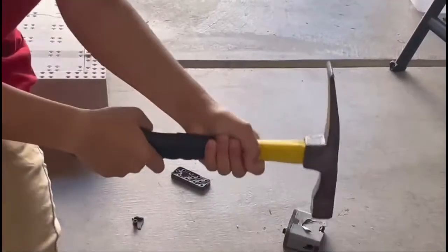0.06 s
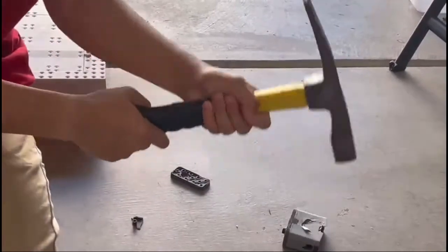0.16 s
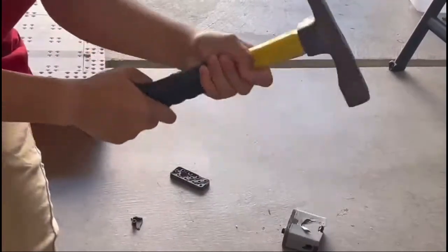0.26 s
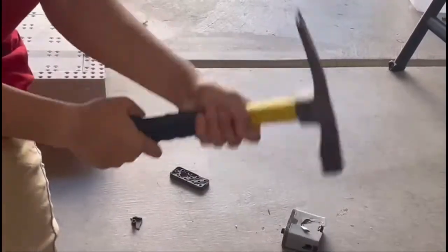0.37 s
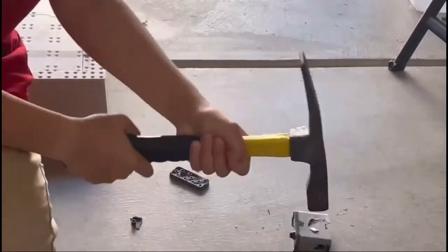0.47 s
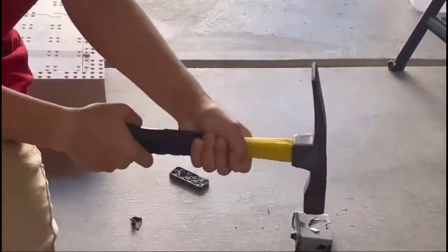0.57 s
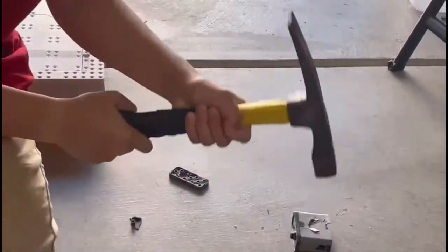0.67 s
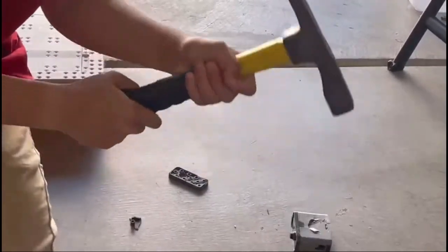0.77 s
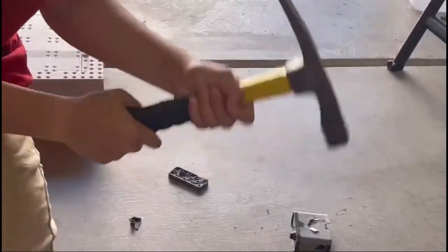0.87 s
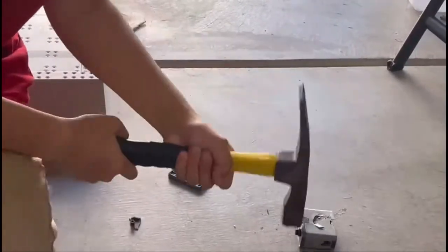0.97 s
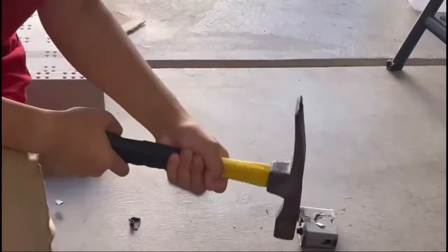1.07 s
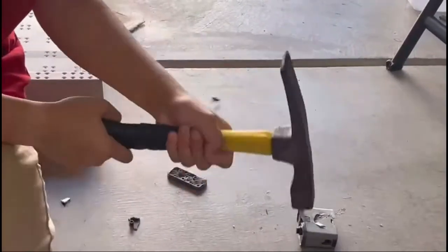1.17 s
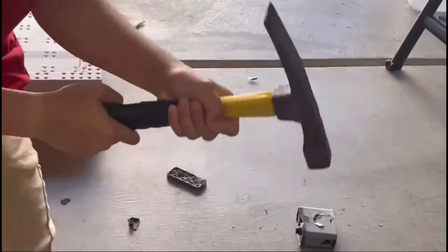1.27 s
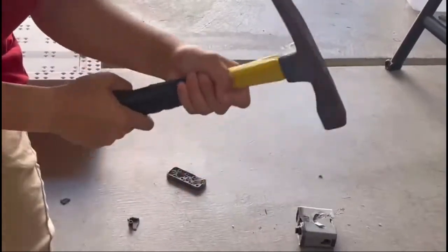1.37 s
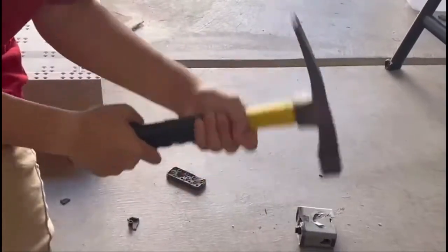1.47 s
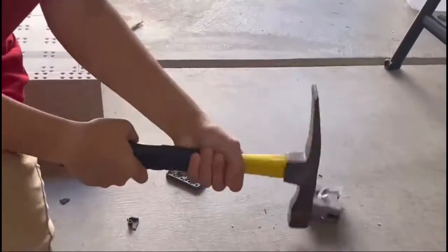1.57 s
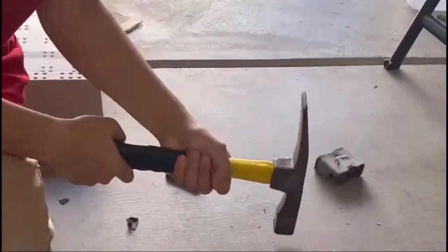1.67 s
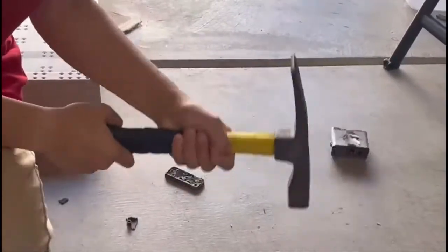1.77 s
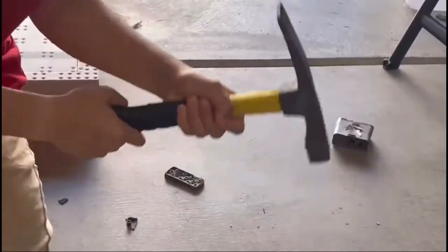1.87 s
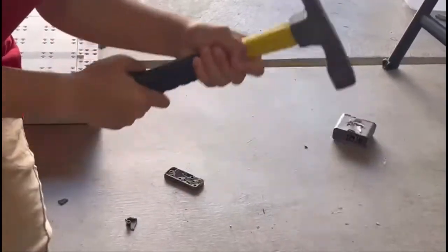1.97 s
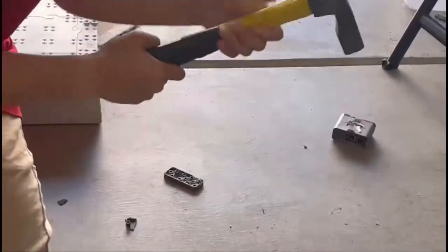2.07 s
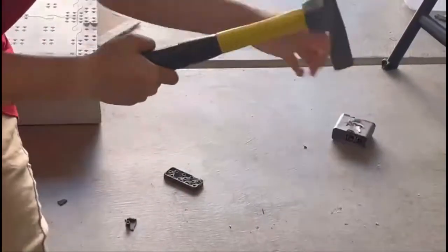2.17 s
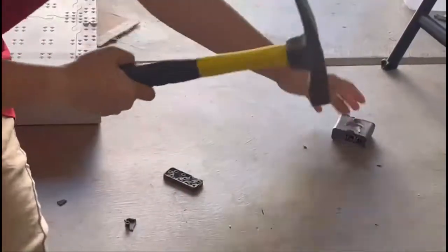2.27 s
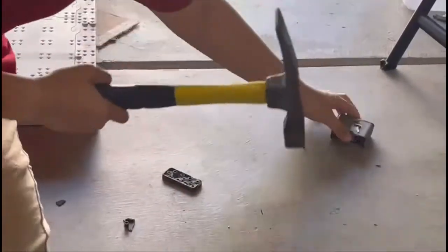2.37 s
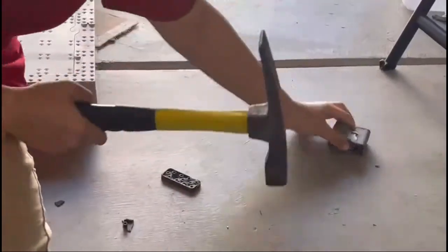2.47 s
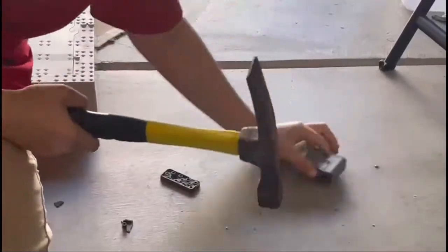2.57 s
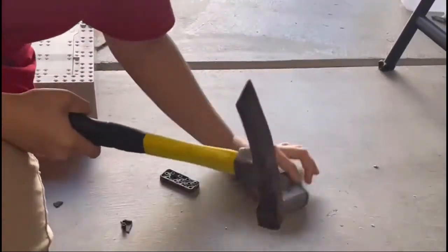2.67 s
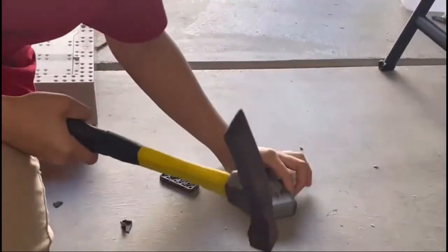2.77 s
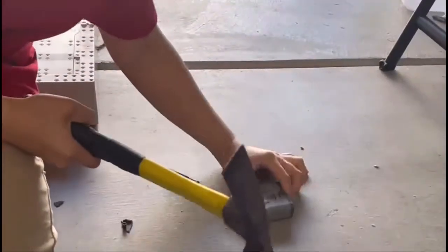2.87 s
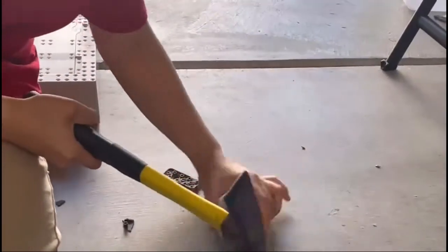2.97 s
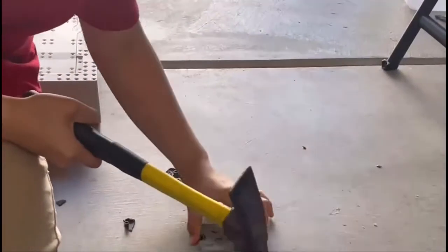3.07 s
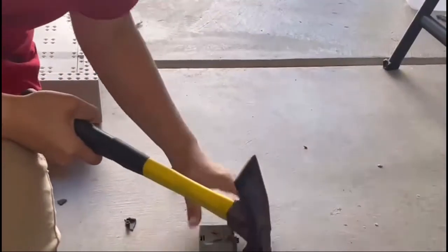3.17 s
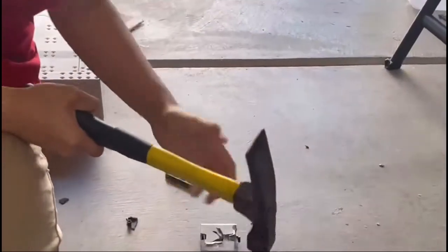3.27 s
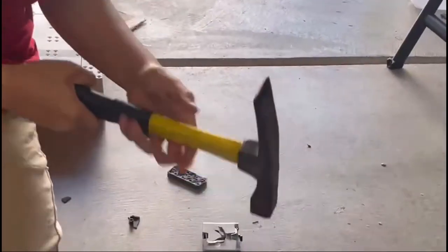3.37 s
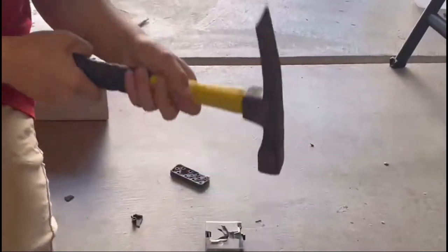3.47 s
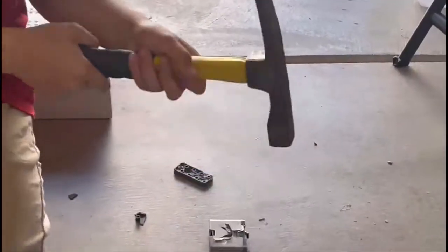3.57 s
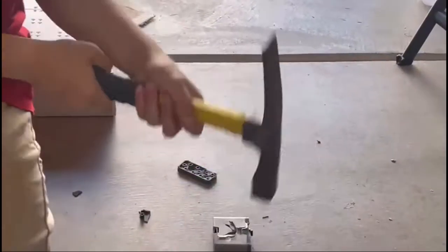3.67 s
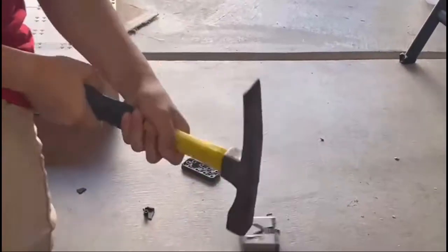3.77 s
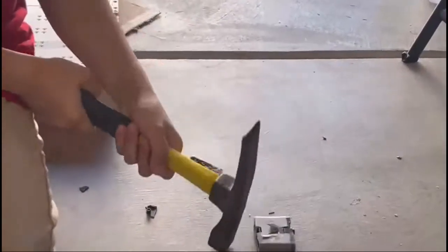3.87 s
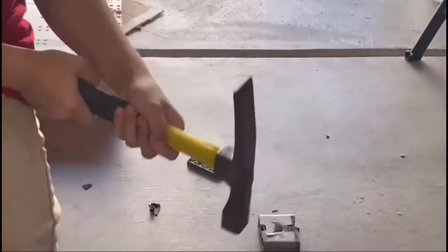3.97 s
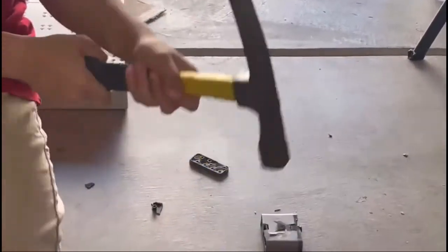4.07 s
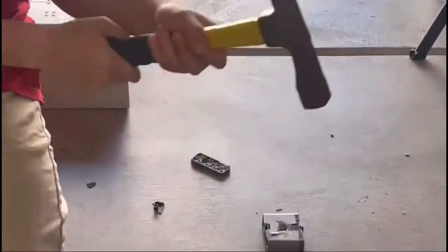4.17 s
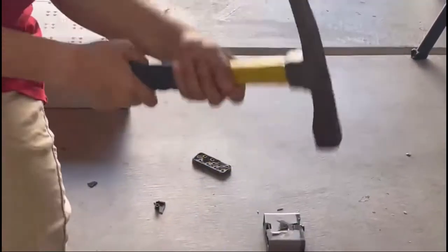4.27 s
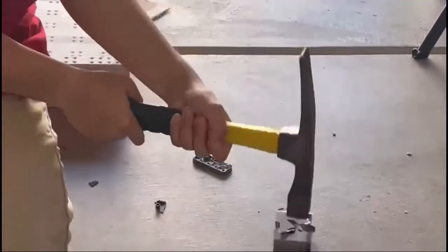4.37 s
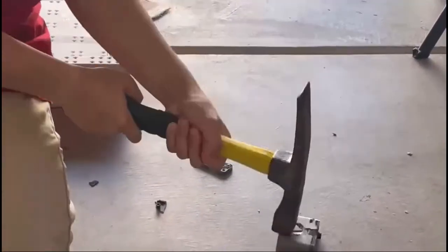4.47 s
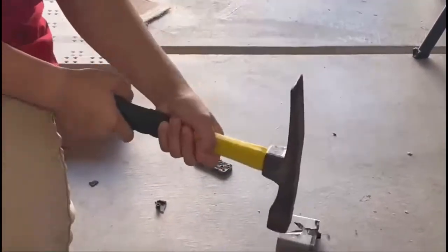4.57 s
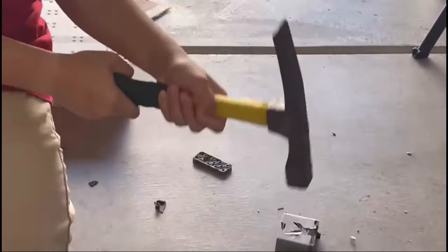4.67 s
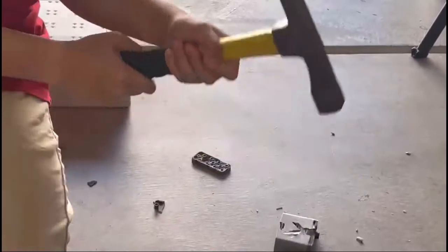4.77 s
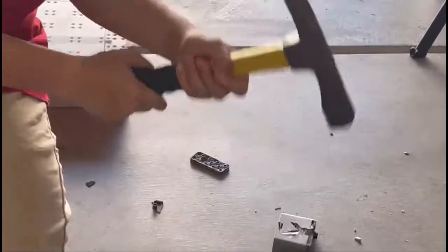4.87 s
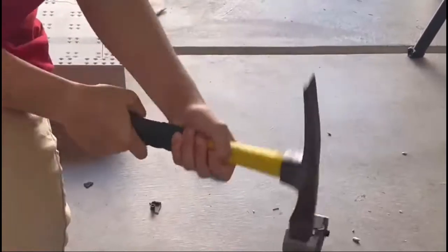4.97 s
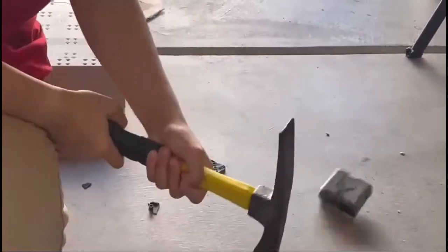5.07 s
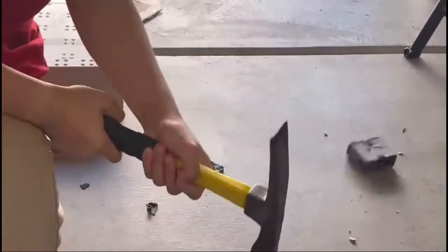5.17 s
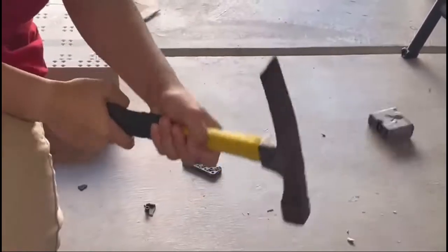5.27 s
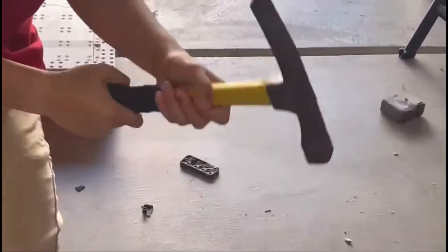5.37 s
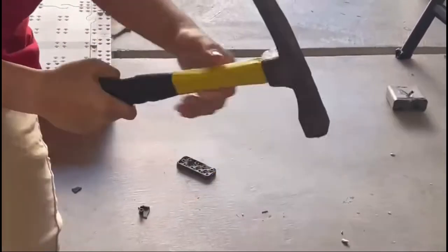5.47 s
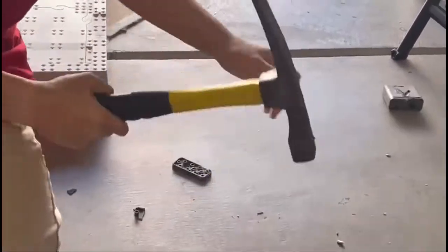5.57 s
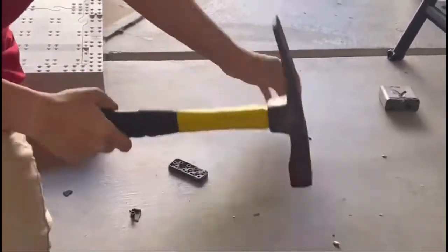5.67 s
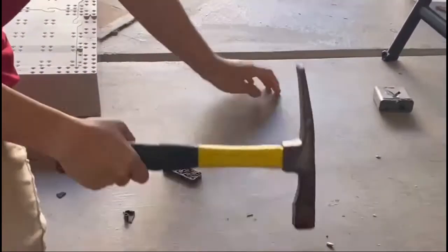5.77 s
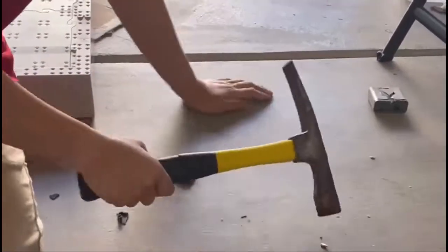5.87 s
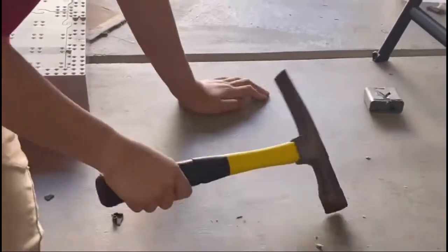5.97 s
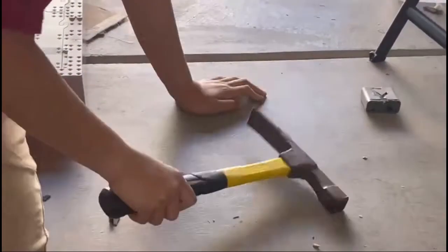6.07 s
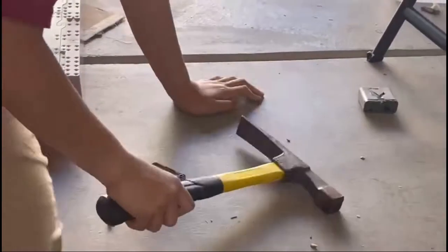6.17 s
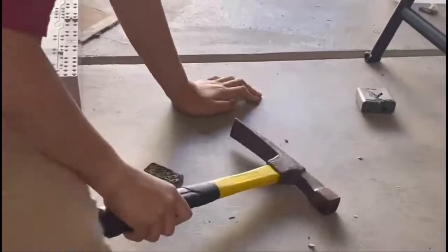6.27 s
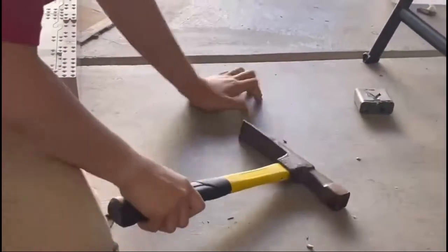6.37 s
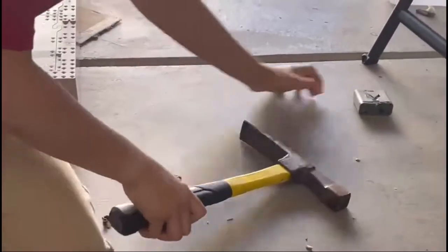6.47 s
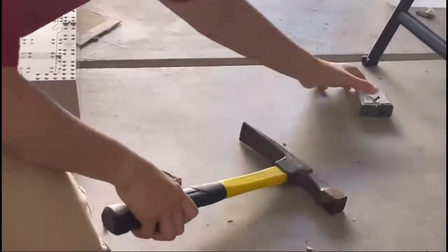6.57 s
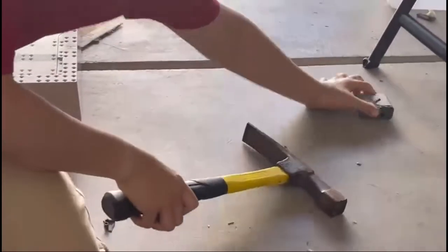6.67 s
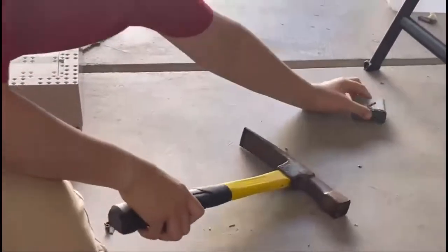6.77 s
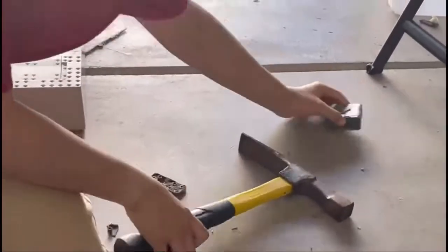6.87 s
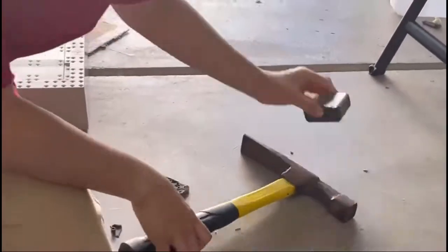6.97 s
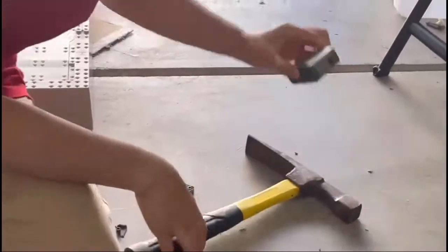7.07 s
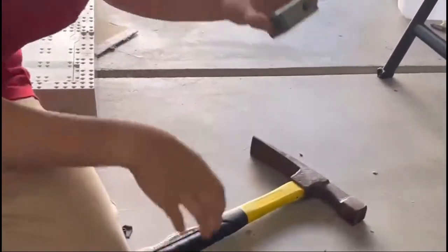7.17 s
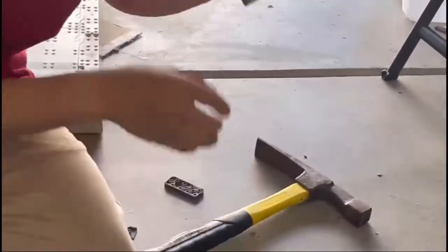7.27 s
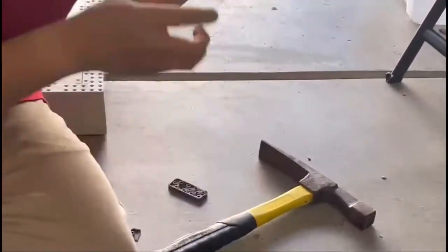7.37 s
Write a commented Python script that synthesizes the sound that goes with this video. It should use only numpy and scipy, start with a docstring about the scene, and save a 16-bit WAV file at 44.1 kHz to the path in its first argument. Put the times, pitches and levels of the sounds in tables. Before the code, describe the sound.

A steel hammer cracks sharply on a small hard plastic casing on concrete, with skids, gritty scrapes, ringing clinks, then the tool is laid down.

```python
"""A steel hammer cracks down on a small plastic motor casing on concrete, close to the microphone: a tick,
a burst of shaped noise and short casing modes, with a thud of the slab. Between blows the casing hops, skids and
is dragged back by hand, as grainy filtered noise; the hammer head clinks on the concrete in ringing steel modes
and is at last laid down. Throughout, a distant engine comes and goes as wavering sine partials
in the low noise rumble of a garage."""
import sys
import numpy as np
from scipy import signal
from scipy.fft import rfft, irfft
from scipy.io import wavfile
from scipy.ndimage import uniform_filter1d

SR = 44100
rng = np.random.default_rng(int(sys.argv[2]) if len(sys.argv) > 2 else 0)


def waveform_to_disk(signal):
    """Save audio, clipped to [-1, 1], as 16-bit WAV at the path in sys.argv[1]."""
    frames = np.transpose(np.atleast_2d(signal))
    scaled = np.clip(frames, -1, 1) * 32767
    samples = np.round(scaled).astype(np.int16)
    wavfile.write(sys.argv[1], SR, samples)


N = 327663  # length in samples
LEAD = SR // 4  # samples before the start, for the blow that falls just ahead of it

# Levels in the tables are relative: each source adds its own trims.
# Blows on the casing, its landings and small knocks: start_s, level_db, thud_db, push_hz,
# struck_spot (0-1 along the casing), brightness (dB per octave), rattle_db
BLOWS = [(-0.18, -2, -12.5, 185, .4, -0.8, -9.5), (0.3779, -3, -21, 185, 0.44, 1, -19),
         (0.3989, -15, -31, 245, 0.5, 2, -19.5), (0.8916, -1, -21.5, 102.4, 0.46, 0.5, -22),
         (1.383, -51, -60.5, 167.4, .4, -2, -27), (1.407, -53.5, -61.5, 168, .8, 4, -26),
         (1.5098, -1.5, -27, 195, 0.25, 3, -18.5), (2.368, -34.5, -77, 129, .4, -3, -43),
         (2.46, -33.5, -69, 109, .7, 11, -12), (2.4854, -32, -60, 180, 0.84, 14, -27),
         (2.496, -34, -76, 194, 0.75, 17, -25), (2.59, -34.5, -60, 102, 0.9, 2, -22),
         (2.628, -35.5, -72, 132, 0.25, -3.5, -19), (2.6438, -38, -72, 102, 0.13, -7, -35),
         (2.8814, -49, -53.5, 102, 0.1, 7, -8), (2.9537, -33.5, -68, 101, 0.24, 2, -19),
         (3.379, -50.5, -62, 103, .3, -2, -17), (3.7108, -1, -21.5, 195, 0.25, 2.5, -23.5),
         (4.3006, 0, -19.5, 250, 0.36, 3.5, -14.5), (4.3798, -5, -28, 248, 0.36, 1.5, -20.5),
         (4.5157, -17.5, -55.5, 193, 0.3, -1.5, -23), (4.6688, -41.5, -62.5, 137, .5, -6, -15.5),
         (4.7671, -49, -70.5, 136.2, .35, -8, -20.5), (4.835, -51, -68, 135, .35, -3, -22),
         (4.856, -51.5, -70.5, 135, .8, 10, -21.5), (4.879, -49.5, -69.5, 135, .35, -2.5, -20.5),
         (4.9079, 0, -18.5, 235, 0.94, 1.5, -20.5), (4.998, -15.5, -25.5, 238, 0.4, -3.5, -11),
         (5.0028, 0, -36, 332, 0.68, 4.5, -33), (5.1057, -9.5, -48, 187, 0.63, 6, -41),
         (5.1413, -17.5, -65, 246.8, .8, 9, -34), (5.167, -23, -63, 280, 0.9, 7, -24),
         (5.1887, -31, -53, 270, .65, 5, -27), (5.1993, -20, -62, 261, 0.8, 7, -28),
         (5.7046, -48, -58, 136, 0.84, -3, -21.5), (7.2617, -52, -52.5, 153.7, 0.02, 3.5, -24),
         (7.2836, -56, -57, 156, .1, 0, -16), (7.307, -47, -56, 153.1, 0.73, 4, -22)]
# Plastic crack spectrum: freq_hz, level_db
CRACK_SPECTRUM = [(250, -16.5), (500, -12), (1100, -11.5), (1880, -4.5), (2900, 0), (4000, -1),
                  (6500, -4.5), (9500, -1.5), (14000, -7.5)]
# Casing modes, low to high along its length: freq_hz, level_db, t60_s
CASING_MODES = [(1910, 0, 0.011), (2826, -6.5, .009), (3850, -6.5, .008), (4430, -12, .006),
                (6630, -4, 0.0055), (8650, -8, 0.0063)]
SPOT_DB = 301.5  # dB a mode loses per squared distance from the struck spot
CRACK_T60_S = .017
LUMPS_DB, LUMPS_HZ = 3, np.geomspace(700, 12000, num=24)  # spread of each blow's own peaks and dips; where
# Hammer head on concrete: start_s, knock_db, knock_hz, thud_db, then level_db of each of four mode families
CLINKS = [(0.981, -20.5, 1900, -36, -21.5, -36, -52, -68.5),
          (1.601, -15.5, 1300, -33, -12.5, -36, -47, -56),
          (3.843, -16, 1320, -27, -23.5, -30.5, -54.5, -66),
          (5.022, -10.5, 1630, -45, -8, -15, -40.5, -29.5), (5.767, -5.5, 1670, -27.5, -9.5, -29, -32, -50),
          (5.938, -14.5, 1960, -39.5, -22.5, -67, -68, -68),
          (5.98, -17.5, 1690, -54, -26.5, -58, -53, -59.5), (5.996, -25, 1550, -55.5, -36, -60.5, -68, -60),
          (6.087, -21, 1106, -41.5, -29.5, -36.5, -53.5, -45.5),
          (6.104, -25.5, 1140, -56, -30, -43, -53, -42.5),
          (6.273, -18.5, 2260, -42, -25.5, -30.5, -56, -37),
          (6.279, -16.5, 1600, -60, -14.5, -33.5, -22.5, -31.5),
          (6.617, -42.5, 843, -52.5, -74, -78, -72, -62), (6.767, -41.5, 1835, -68, -40.5, -84, -79, -69),
          (7.138, -30, 1583, -43, -42, -48, -57, -54)]
# Steel head, four families of modes: freq_hz, level_db, t60_s
HEAD_MODES = [
    [(2973, 6.5, 0.029), (3030, -8.5, 0.02), (2980, -31, 0.55)],
    [(4325, 8, .026), (7530, -0.5, 0.0076)],
    [(5190, 6, 0.12)],
    [(6260, 8, .047)],
]
# Floor and room modes: freq_hz, level_db, t60_s
SLAB_MODES = [(86.7, 1, 0.42), (114, -2.5, 0.13), (182.5, 2, 0.19), (256.7, -4, 0.61), (326, -5.5, 0.48),
              (379.6, -8, 0.53), (436.9, -6.5, 0.26), (544, -16, 0.72)]
HUM_DB = -2.5  # slab boom of a blow against its thud level
HUM_DB_PER_OCTAVE, FULL_HUM_HZ = 7.5, 186  # pushes deeper than this pitch leave less boom behind
SWEEP, PUSH_TOP = 1.2, 0.48  # push pitch starts raised by 2 x SWEEP times itself; cycles of its pitch to its top
# Echo decay by band: freq_hz, t60_s
ROOM_DECAY = [(100, 1), (400, 0.86), (1100, .5), (3000, 0.36), (5000, 0.39), (7000, 0.31), (13000, 0.34)]
ROOM_DB = -12
# Strokes of casing, hands and handle over gritty concrete: top_s, level_db, rise_s, fall_s,
# brightness (dB per octave)
STROKES = [(0.53, -61, 0.14, 0.11, -0.5), (0.871, -69.5, 0.1616, 0.12, -1), (1.08, -53.5, 0.14, 0.19, -4.5),
           (1.39, -78, 0.035, 0.051, 12.5), (1.47, -74, 0.049, 0.068, 3.5), (1.74, -48, 0.21, 0.21, 4),
           (2.082, -67.5, 0.099, .08, 0), (2.374, -56.5, .004, 0.39, 4.5), (2.3, -75, 0.19, 0.13, 0.5),
           (2.484, -51, 0.11, 0.048, 7.5), (2.592, -56, .004, .15, 1), (2.65, -47, 0.079, 0.09, 3),
           (2.8, -62.5, 0.13, 0.36, 1), (2.965, -49, 0.026, 0.18, 2), (3.33, -71.5, 0.24, 0.37, -5),
           (3.459, -62, .01, 0.14, 2.5), (3.6, -65.5, 0.43, 1, 1.5), (3.9, -59.5, 0.026, .1, -12),
           (4.03, -86, 0.061, .08, -2), (4.535, -48, 0.014, 0.16, -1.5), (4.584, -61, 0.034, 0.13, 6.5),
           (4.86, -69, .12, 0.18, 2.5), (5.244, -40, 0.14, 0.067, 6), (5.32, -48, 0.3, 0.35, 4.5),
           (5.8, -50.5, .015, .04, 1), (5.88, -60.5, 0.29, 0.86, 4.5), (5.983, -47, .012, 0.018, -4),
           (6.25, -50.5, 0.51, 0.11, 0.5), (6.35, -47, 0.19, 0.09, 1.5), (6.47, -66.5, .1, .2, 1.5),
           (6.599, -61, .14, .25, 0.5), (6.8, -58.5, 0.27, 0.15, 3.5), (6.985, -62.5, 0.066, 0.083, 0.5),
           (7.066, -55.5, 0.084, 0.091, 1.5), (7.152, -53, 0.028, 0.11, -5)]
STROKE_DB, STROKE_BEND = 25.5, 1.53  # dB lost one rise before or one fall after the top; power of that curve
# Sliding noise spectrum: freq_hz, level_db
GRIT_SPECTRUM = [(250, -19.5), (500, -10), (1000, -4), (1500, -4), (1880, 0.5), (2350, -3), (2950, 1.5),
                 (3700, -3), (4700, -5), (6200, -4.5), (7500, -7.5), (9500, -7.5), (14000, -14)]
GRAINS_PER_S, GRAIN_DB = 1100, -5  # mean rate of sand snaps; their level against the hiss
# The empty casing hums most under dull strokes, less under bright ones: centre_hz, width_octaves, level_db,
# lost_db (per dB per octave of brightness)
HOLLOW_HUM = (2050, 0.35, 4.7, 2.5)
# Engine partials, one list of breakpoints each: time_s, pitch_hz, level_db
ENGINE_PARTIALS = [
    [(0, 137, -65.5), (.8, 158.3, -57.5), (1.4, 162, -62), (2.7, 177, -71.5)],
    [(1.0, 195.6, -56), (1.3, 194.6, -64.5), (1.6, 195, -71.5)],
    [(2.6, 83.1, -74), (2.8, 83.2, -59), (3.3, 83, -70), (3.6, 87.3, -65), (4.3, 90.8, -75.5)],
    [(4.5, 133.2, -55), (5.27, 138.3, -59.5), (5.9, 144.8, -54), (6.5, 151.7, -52.5), (7.43, 155.4, -57.5)],
]
# Garage rumble spectrum: freq_hz, level_db
RUMBLE_SPECTRUM = [(15, -33.5), (30, -14.5), (60, -7), (90, -5), (195, -15.5), (260, -16.5), (440, -26.5),
                   (1000, -35), (2000, -44), (4000, -57), (9000, -73.5)]
RUMBLE_DB = -56.5
# Microphone response, with port notch and peak: freq_hz, level_db
MIC_RESPONSE = [(8500, -0.8), (9800, -6.5), (10250, -25), (10700, -3.5), (11700, 5.5), (12900, -7),
                (13400, -29), (14300, -40)]
LOW_CUT_HZ, EDGE_HZ = 40, 14300  # band limits
QUIET_DB, QUIET_FROM_HZ = -108, 1500  # treble bins near or under this level are turned down
CEILING = .75  # amplitude that the rounded peaks approach


def blow(db, thud_db, push_hz, spot, slope_db, rattle_db):
    """A steel tick, a lumpy crack of plastic, the modes near the struck spot, loose parts rattling after it."""
    t = np.arange(SR // 2) / SR
    noise, lumps, boom = rng.standard_normal((3, len(t)))
    strikes = rng.standard_normal(len(SLAB_MODES))

    uneven = gain_of(1.2 * evened(uniform_filter1d(lumps, size=40)))  # many small fractures
    snap = gain_of(-60 * t / CRACK_T60_S)
    rattle = gain_of(rattle_db + 2.5 - 60 * t / 0.26)
    shape = np.minimum(t / 0.00051, 1) * (snap + rattle)
    lump_levels = LUMPS_DB * rng.standard_normal(len(LUMPS_HZ))
    lump_spectrum = list(zip(LUMPS_HZ, lump_levels))
    plastic = tinted(noise * uneven, CRACK_SPECTRUM, slope_db)
    crack = evened(tinted(plastic, lump_spectrum)) * shape / 2

    # a softer, duller shudder under the rattle, dying sooner than it
    shudder = evened(tinted(lumps, CRACK_SPECTRUM, slope_db - 2.0))
    shudder = shudder * gain_of(rattle_db - 9.5 - 60 * t / 0.18) * np.minimum(t / 0.0036, 1)

    tick = evened(tinted(noise, CRACK_SPECTRUM, slope_db + 4))
    tick = tick * gain_of(-10.5 - 60 * abs(t - .0012) / 0.00093)

    casing = np.zeros(len(t))
    places = np.linspace(0.1, .9, len(CASING_MODES))
    for (hz, level_db, t60), place in zip(CASING_MODES, places):
        casing += ring(t, hz, level_db - SPOT_DB * (spot - place) ** 2, t60)
    casing = casing * np.minimum(t / .0008, 1)

    sharp = gain_of(db) * (tick + crack + casing + shudder)
    depth_octaves = np.log2(min(push_hz / FULL_HUM_HZ, 1))
    hum_db = thud_db + HUM_DB + HUM_DB_PER_OCTAVE * depth_octaves
    return sharp, thud(t, thud_db, push_hz, hum_db, strikes, boom)


def clink(db, knock_hz, thud_db, *families_db):
    """The head rings in its modes over a dull knock of concrete."""
    t = np.arange(SR // 2) / SR
    noise, boom = rng.standard_normal((2, len(t)))
    strikes = rng.standard_normal(len(SLAB_MODES))

    steel = np.zeros(len(t))
    for modes, family_db in zip(HEAD_MODES, families_db):
        for mode in modes:
            steel += gain_of(family_db) * ring(t, *mode)

    stone = evened(signal.lfilter(*signal.butter(3, [500, 2600], "band", fs=SR), noise))
    chatter = gain_of(-60 * t / 0.012) + gain_of(-10.5 - 60 * t / 0.15)  # the handle shudders after contact
    stone = gain_of(db - 8.0) * stone * chatter
    knock = ring(t, knock_hz, db + 4, .009)
    # grit crushed under the face
    tick = evened(np.diff(noise, prepend=0)) * gain_of(db - 19.5 - 60 * t / 0.019)

    rise = np.sin(np.pi / 2 * np.minimum(t / 0.0013, 1)) ** 2  # contact force builds over the touch
    sharp = (steel + stone + knock + tick) * rise
    return sharp, thud(t, thud_db, 240, thud_db - 1.5, strikes, boom)


def thud(t, push_db, push_hz, hum_db, strikes, noise):
    """The slab answers a few ms late with a falling push, then booms on: a few modes in a dense blur of others."""
    late = np.maximum(t - .0032, 0)
    # high bending waves arrive first, so the pitch slides down
    turns = push_hz * late + SWEEP * 0.38 * (1 - np.exp(-late * push_hz / 0.19))
    swell = late * push_hz / PUSH_TOP
    push = gain_of(push_db + 6) * swell * np.exp((1 - swell ** 2) / 2) * np.sin(2 * np.pi * turns)

    modes = sum(gain_of(1.3 * z) * ring(late, *mode) for mode, z in zip(SLAB_MODES, strikes))
    blur = evened(signal.lfilter(*signal.butter(2, [70, 520], "band", fs=SR), noise))
    blur = blur * gain_of(4.5 - 60 * late / 0.25)
    onset = 1 - np.exp(-late / 0.00067)
    return push + gain_of(hum_db - 10.5) * (modes + blur) * onset


def room_tail():
    """Dense echoes of random sign, each band dying at its own speed."""
    taps = rng.standard_normal(SR // 2) * (rng.random(SR // 2) < .1)
    hz, t, z = signal.stft(taps, SR, nperseg=256)
    decay = gain_of(-60 * t / read(ROOM_DECAY, hz)[:, None])
    tail = signal.istft(z * decay, SR, nperseg=256)[1]
    tail = tail * np.clip(np.arange(len(tail)) / SR / 0.0038 - .5, 0, 1)  # short gap and fade-in
    return tail / np.linalg.norm(tail)


def impacts():
    """Every blow and clink; their sharp parts echo through four random room tails in turn."""
    out = np.zeros(LEAD + N + SR)
    tails = [room_tail() for _ in range(4)]
    rows = [(blow, row) for row in BLOWS] + [(clink, row) for row in CLINKS]
    for k, (source, (start_s, *settings)) in enumerate(rows):
        sharp, low = source(*settings)
        at = LEAD + round(start_s * SR)
        echo = gain_of(ROOM_DB) * signal.fftconvolve(sharp, tails[k % 4])
        out[at:at + len(sharp)] += sharp + low
        out[at:at + len(echo)] += echo[:len(out) - at]
    return out[LEAD:LEAD + N]


def rubbing():
    """Hiss of sliding with sand grains snapping in it; each stroke swells and fades, its colour shifting in patches."""
    sizes = gain_of(4.9 * np.minimum(rng.exponential(1, N), 4))
    snaps = sizes * (rng.random(N) < GRAINS_PER_S / SR)
    grains = evened(snaps * rng.choice([-1., 1.], N))
    drive = rng.standard_normal(N) + gain_of(GRAIN_DB) * grains
    hz, t, z = signal.stft(evened(tinted(drive, GRIT_SPECTRUM)), SR, nperseg=256)
    patches = patchy(z.shape, 7, 6)

    hum_hz, octaves, hum_db, lost_db = HOLLOW_HUM
    hum = np.exp(-(np.log2((hz[:, None] + 1) / hum_hz) / octaves) ** 2)
    power = np.zeros(z.shape)
    for top_s, db, rise_s, fall_s, slope_db in STROKES:
        away = abs(t - top_s) / np.where(t < top_s, rise_s, fall_s)
        tilt_db = slope_db * np.log2((hz[:, None] + 200) / 4000)
        colour_db = tilt_db + hum * max(hum_db - lost_db * max(slope_db, 0), 0)
        power += gain_of(db - STROKE_DB * away ** STROKE_BEND + colour_db) ** 2
    return signal.istft(z * np.sqrt(power) * gain_of(2.6 * patches), SR, nperseg=256)[1][:N]


def engine():
    """Single sine partials that mostly creep upward, their levels wavering a little."""
    t, out = np.arange(N) / SR, np.zeros(N)
    for rows in ENGINE_PARTIALS:
        s, hz, db = np.transpose(rows)
        slow = uniform_filter1d(rng.standard_normal(N), size=2500)
        waver = evened(uniform_filter1d(slow, size=2500))
        fade = np.clip(np.minimum(t - s[0], s[-1] + 0.46 - t) / 0.053, 0, 1)
        level = gain_of(np.interp(t, s, db) + 2.5 + 2.0 * waver)
        turns = np.cumsum(np.interp(t, s, hz)) / SR
        out += fade * level * np.sin(2 * np.pi * turns)
    return out


def rumble():
    """Low noise of the street and the building, swelling slowly in patches."""
    noise = evened(tinted(rng.standard_normal(N), RUMBLE_SPECTRUM))
    hz, t, z = signal.stft(noise, SR, nperseg=2048)
    patches = patchy(z.shape, 8, 8)
    return gain_of(RUMBLE_DB) * signal.istft(z * gain_of(3.0 * patches), SR, nperseg=2048)[1][:N]


def patchy(shape, bins, frames):
    """Random field smoothed over frequency and time, rms 1."""
    smooth = uniform_filter1d(rng.standard_normal(shape), size=bins, axis=0)
    return evened(uniform_filter1d(smooth, size=frames, axis=1))


def ring(t, hz, db, t60):
    """One dying mode."""
    return gain_of(db - 60 * t / max(t60, .004)) * np.sin(2 * np.pi * hz * t)


def tinted(x, points, slope_db=0):
    """Colours x by a spectrum, tipped about 3 kHz."""
    hz = np.fft.rfftfreq(len(x), 1 / SR)
    colour_db = read(points, hz) + slope_db * np.log2((hz + 200) / 3000)
    return irfft(rfft(x) * gain_of(colour_db), len(x))


def read(points, hz):
    """Reads a table on a log-frequency axis."""
    f, value = np.transpose(points)
    return np.interp(np.log(hz + 1), np.log(f + 1), value)


def evened(x):
    """Scales to rms 1."""
    return x / np.sqrt(np.mean(x ** 2) + 1e-20)


def gain_of(db):
    """Decibels to amplitude."""
    return 10 ** (np.asarray(db) / 20)


def suppressed(x):
    """Noise suppressor: turns down faint treble, so that tails end sooner."""
    hz, t, z = signal.stft(x, SR, nperseg=512)
    power = uniform_filter1d(uniform_filter1d(abs(z) ** 2, size=5, axis=1), size=3, axis=2)
    keep = np.where(hz[:, None] > QUIET_FROM_HZ, power / (power + gain_of(QUIET_DB) ** 2), 1)
    return signal.istft(z * keep, SR, nperseg=512)[1][:, :N]


def scene():
    """All sources at one microphone."""
    return (impacts() + rubbing() + engine() + rumble())[None]


def record(dry):
    """Microphone colour, low cut and noise suppression, a firm knee on the peaks, then the band limit."""
    hz = np.linspace(0, SR / 2, 400)
    mic = signal.firwin2(511, hz, gain_of(read(MIC_RESPONSE, hz)), fs=SR)
    coloured = signal.oaconvolve(dry, mic[None], "same")
    coloured = signal.lfilter(*signal.butter(2, LOW_CUT_HZ, "high", fs=SR), coloured)
    coloured = suppressed(coloured)
    rounded = coloured / (1 + (coloured / CEILING) ** 4) ** .25
    band_limit = signal.firwin(511, EDGE_HZ, window=("kaiser", 9), fs=SR)
    return signal.oaconvolve(rounded, band_limit[None], "same")


dry = scene()
out = record(dry)
waveform_to_disk(out)
```